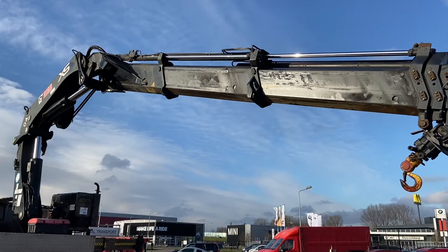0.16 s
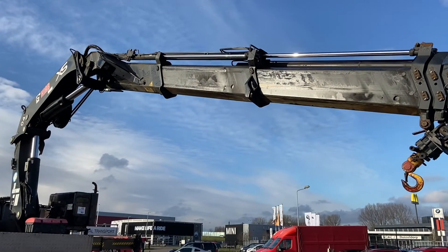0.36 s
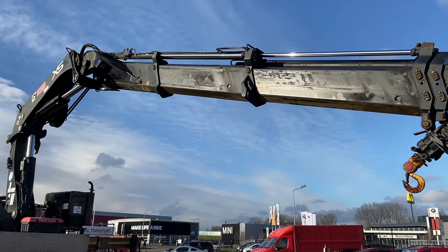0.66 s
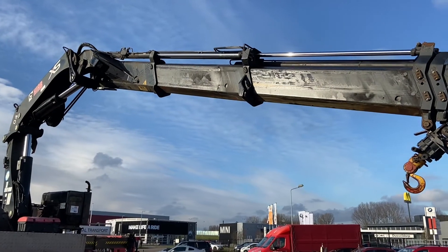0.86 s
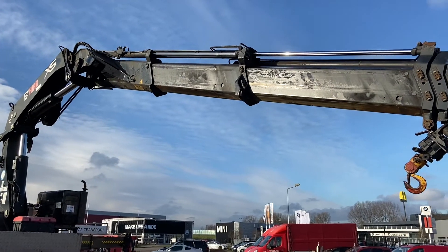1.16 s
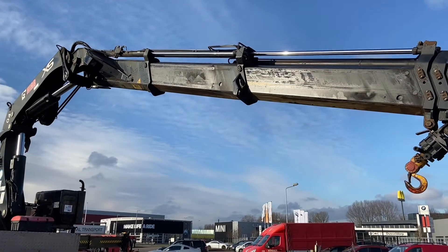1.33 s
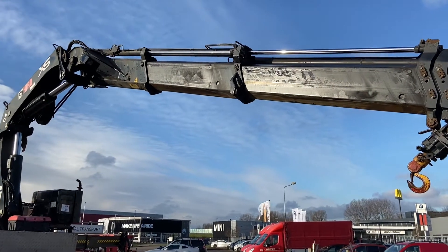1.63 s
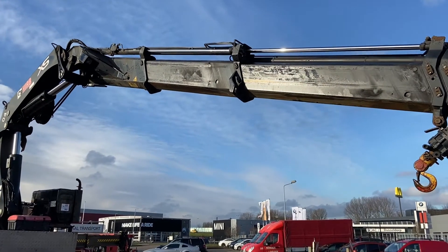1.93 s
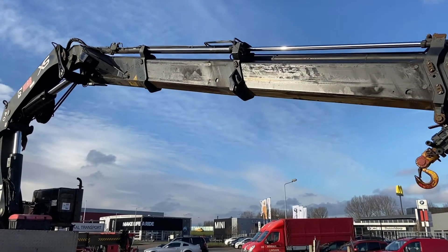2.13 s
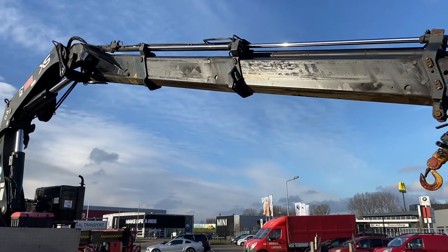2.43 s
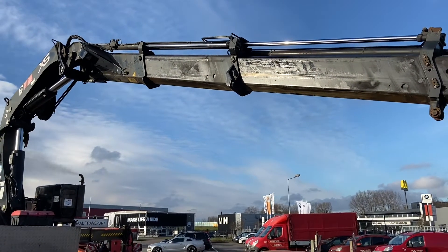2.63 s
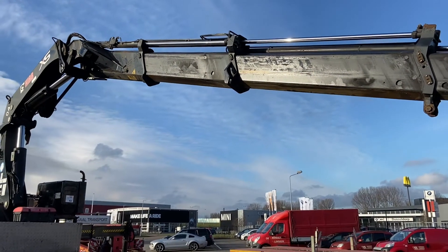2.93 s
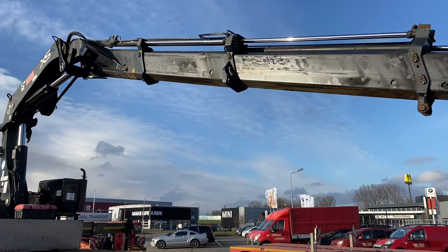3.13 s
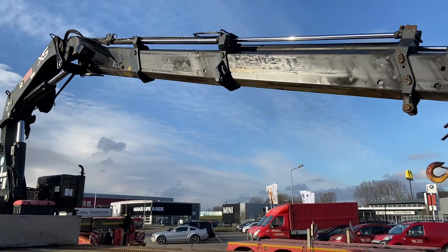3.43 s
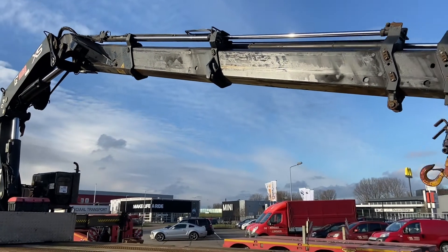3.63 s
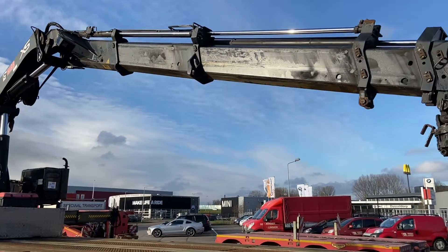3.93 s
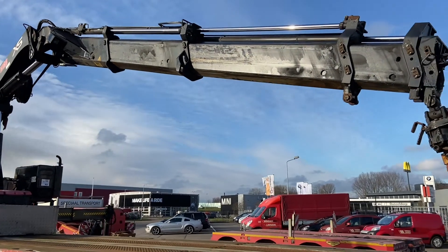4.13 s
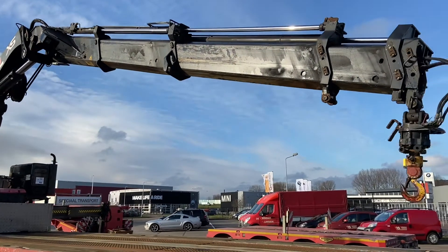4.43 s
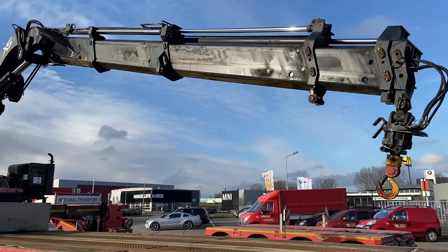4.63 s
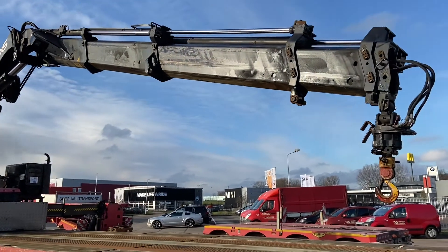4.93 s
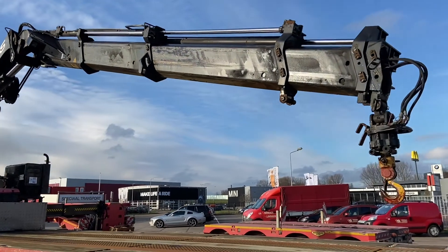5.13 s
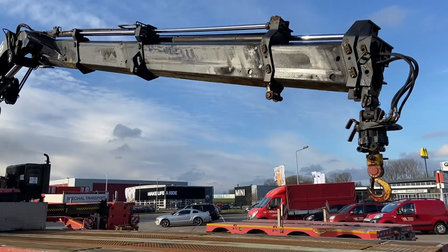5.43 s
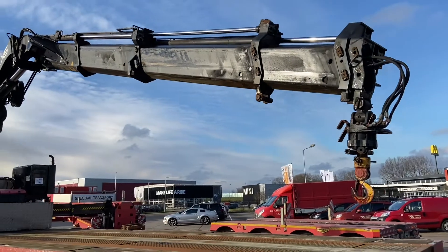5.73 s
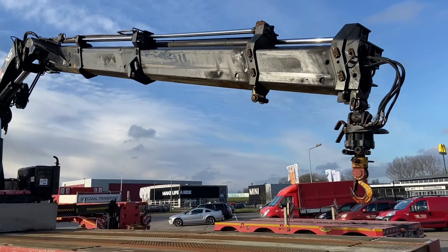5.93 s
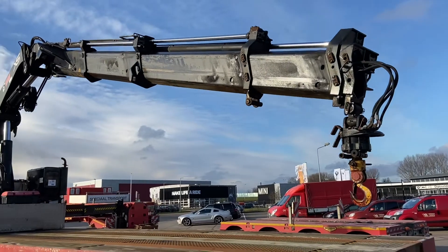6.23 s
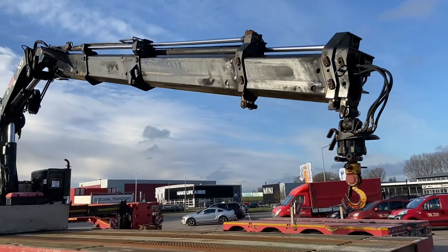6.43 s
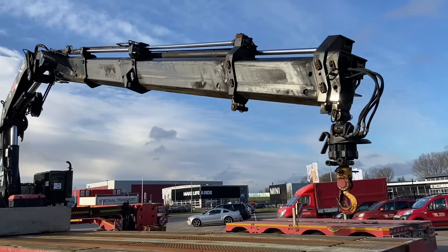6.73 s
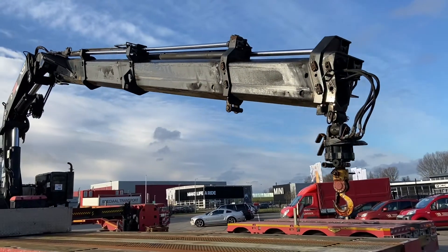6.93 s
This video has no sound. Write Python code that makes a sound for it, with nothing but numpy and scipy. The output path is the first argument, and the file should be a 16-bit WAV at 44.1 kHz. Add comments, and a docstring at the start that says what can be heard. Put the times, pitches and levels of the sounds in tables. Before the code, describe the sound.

Steady diesel idle with metallic knock; a short valve zip, wind thumps, then a strained engine with hydraulic pump whine and oil hiss.

```python
"""A six-cylinder diesel truck idles in an open yard: its firings shake noise out of the block, tones follow its crank.
It drives the pump of its crane. After two seconds the boom takes oil: the engine sags,
the backlash knock fades, and the drive gear and pump whine. Oil noise hisses and whistles in the valves.
Wind thumps on a small two-port microphone: noise swells in gusts, and short pressure pulses are the eddies."""
import sys
import numpy as np
from scipy import signal
from scipy.fft import rfft, irfft
from scipy.io import wavfile

SR = 44100
rng = np.random.default_rng(int(sys.argv[2]) if len(sys.argv) > 2 else 0)


def pcm_store(signal):
    """Save signal as 16-bit PCM."""
    levels = np.round(np.clip(np.atleast_2d(signal), -1, 1) * 32767)
    wavfile.write(sys.argv[1], SR, levels.astype(np.int16).T)


N = 311787
TIME, FREQS = np.arange(N) / SR, np.fft.rfftfreq(N, 1 / SR)


def amp(db):
    """Amplitude ratio: 20 dB is a factor of ten."""
    return 10 ** (np.asarray(db) / 20)


def evened(x):
    """Normalization to an rms of 1."""
    return x / np.sqrt(np.mean(x ** 2) + 1e-20)


def curve(rows):
    """Linear interpolation of (seconds, value) rows at every sample."""
    s, value = np.transpose(rows)
    return np.interp(TIME, s, value)


def read(points):
    """Interpolation of (Hz, value) rows over log frequency on the FFT grid."""
    hz, value = np.transpose(points)
    return np.interp(np.log(FREQS + 1), np.log(hz + 1), value)


def ramp(s, length):
    """Linear rise from 0 to 1, starting at s."""
    return np.clip((TIME - s) / length, 0, 1)


def shaped(x, gain):
    """Linear filtering: a product of spectra on the FFT grid."""
    return irfft(rfft(x) * gain, N)


def noise(gain):
    """Filtered Gaussian noise of rms 1."""
    return evened(shaped(rng.standard_normal(N), gain))


def band(hz, width):
    """Resonance: noise of rms 1 concentrated about one frequency."""
    return noise(1 / (1 + (2 * (FREQS - hz) / width) ** 2))


def drift(hz):
    """Band-limited random fluctuation of rms 1, up to about the given rate."""
    count = int(TIME[-1] * 2 * hz) + 4
    smooth = signal.resample(rng.standard_normal(count), 4 * count)
    return evened(np.interp(TIME * 8 * hz, np.arange(len(smooth)), smooth))


def strokes(cycles, rise, fall):
    """Periodic amplitude modulation: one quick swell and slow fall a cycle, of uneven strength."""
    part = cycles % 1
    index = np.floor(cycles).astype(int) + 1
    strength = amp(.9 * rng.standard_normal(index.max() + 1))[index]
    return evened(strength * (1 - np.exp(-part / rise)) * np.exp(-part / fall))


def pulsing(blows, pulsed):
    """Power mixing of a steady part and a pulsed part into one envelope."""
    return np.sqrt(1 - pulsed + pulsed * blows ** 2)


def tone(turns, order, waver_db=1.5, wobble=0.18):
    """Order locking: a sine tied to crank angle, wavering in level and phase (radians)."""
    angle = 2 * np.pi * (order * turns + rng.random()) + wobble * drift(14)
    return np.sqrt(2) * np.sin(angle) * amp(waver_db * drift(9))


def puff(hz, cycles, glide):
    """Transient pulse: a few cycles swell quickly and fall in pitch toward hz as they die."""
    t = np.arange(SR // 10) / SR
    age = t * hz / cycles
    phase = 2 * np.pi * (hz * t + glide * cycles * (1 - np.exp(-age)))
    return (age * np.exp(1 - age)) ** 2 * np.sin(phase)


# Engine speed. Each row: time in seconds, firings per second.
ENGINE_SPEED = [(0, 50.88), (1.7, 50.88), (2.05, 50.4), (2.35, 49.4), (2.65, 48.85), (2.95, 48.55),
                (3.25, 48.62), (3.55, 48.9), (4.2, 49.1), (5.2, 49.08), (5.8, 49.2), (6.5, 49.33),
                (7.07, 49.25)]
# strain starts below the governed speed and is full at SAG below it (firings per second)
GOVERNED, SAG = 49.15, .35


def engine():
    """Governor droop: the firing count is the integral of speed, and lost speed is strain."""
    speed = curve(ENGINE_SPEED)
    firings = np.cumsum(speed) / SR
    strain = np.clip((GOVERNED - speed) / SAG, 0, 1)
    return firings, strain


# Spectrum of the block before its low-frequency rolloff. Each row: frequency in Hz, dB per Hz.
BLOCK_SPECTRUM = [(25, -43), (60, 11), (120, 6), (220, 0), (330, -5), (540, -4.5), (750, -0.5), (1100, -4),
                  (1400, -4), (1800, -6), (2400, -7), (3200, -14.5), (4300, -18.5), (6000, -22),
                  (15500, -32.5)]
# Repetition of the rattle. Each row: frequency in Hz, share of power that repeats each engine cycle.
REPEATED_SHARE = [(50, .2), (300, .35), (1000, .3), (2500, .22), (5000, .1), (9000, .05)]
# Change of the rattle under load. Each row: frequency in Hz, gain in dB.
LOAD_COLOUR = [(120, -2), (300, -0.1), (550, 1.5), (800, 0), (1200, 1.06), (2000, 0), (5000, -2)]
# level running free, and what load and strain add (dB)
CLATTER_DB, CLATTER_LOAD_DB, CLATTER_STRAIN_DB = -24, 0.08, 1.0


def clatter(firings, load, strain, pulsed=0.39):
    """Forced vibration: firings rattle the block, partly alike in every six-firing cycle."""
    pattern = rng.standard_normal(int(6 * SR / ENGINE_SPEED[-1][1]))
    cycle_part = firings / 6 % 1
    repeating = evened(np.interp(cycle_part, np.linspace(0, 1, len(pattern)), pattern))
    share = np.clip(read(REPEATED_SHARE), 0, 1)
    fresh = shaped(rng.standard_normal(N), np.sqrt(1 - share))
    rattle = shaped(repeating, np.sqrt(share)) + fresh

    blows = strokes(firings - .52, rise=0.0094, fall=0.59)
    radiated = FREQS ** 4 / (FREQS ** 4 + 48 ** 4)  # weak radiation below 48 Hz
    body = evened(shaped(rattle * pulsing(blows, pulsed), radiated * amp(read(BLOCK_SPECTRUM))))
    loaded = shaped(body, amp(read(LOAD_COLOUR)))
    level = amp(CLATTER_DB + CLATTER_LOAD_DB * load + CLATTER_STRAIN_DB * strain)
    return ((1 - load) * body + load * loaded) * level


# Upper exhaust note. Each row: time in seconds, level in dB.
DRONE_LEVEL = [(0, -40), (.35, -27), (.62, -33), (.85, -25), (1.6, -30.5), (3.3, -37), (3.55, -26),
               (3.85, -35.5), (4.3, -31), (4.6, -23), (5.1, -23), (5.3, -30), (5.55, -34), (5.8, -26.5),
               (6.15, -29), (6.4, -24.5), (7.07, -22.5)]
# the lower note: level running free, and level against the upper note under load (dB)
HUM_FREE_DB, HUM_LOADED_DB = -19.5, -5.5


def drone(turns, load):
    """Harmonics of the firing rate: the second follows the third in level under load."""
    drone_db = curve(DRONE_LEVEL)
    hum_db = (1 - load) * HUM_FREE_DB + load * (drone_db + HUM_LOADED_DB)
    low = amp(hum_db) * tone(turns, order=6, waver_db=1.1, wobble=.15)
    high = amp(drone_db) * tone(turns, order=9, waver_db=.8, wobble=.1)
    return low + high


# Machine tones. Each row: cycles per crank turn, level running free in dB, level under load in dB.
MACHINE_TONES = [(3, -33, -53), (12, -36, -39), (17, -38.5, -45), (24, -44, -47), (31, -43, -51),
                 (38, -42, -55), (41, -43, -52), (49, -50, -45), (54, -48, -45), (86, -44, -56),
                 (96, -45, -53), (108, -60, -49), (126, -58, -46), (132, -48, -58), (141, -48, -59),
                 (144, -59, -45), (145, -48, -55)]


def machine_tones(turns, load):
    """Order spectrum: gear and pump tones keep fixed ratios to the crank as load shifts their levels."""
    out = np.zeros(N)
    for order, free_db, loaded_db in MACHINE_TONES:
        out += amp(free_db + load * (loaded_db - free_db)) * tone(turns, order=order)
    return out


# Modes of the pump drive's housing. Each row: frequency in Hz, relative level in dB, t60 in seconds.
HOUSING_MODES = [(290, -14, .025), (530, -8, .022), (610, 2, .045), (660, -3, .024), (790, -3, .016),
                 (950, -3.5, .018), (1120, -10, .012), (1450, -10, .015), (2240, -14, .012),
                 (2450, -14, .012)]
# Contacts of the drive's backlash, one row per place below. Each row: peak in dB before scatter,
# pitch it falls toward in Hz, length in cycles, share that rings the housing.
BACKLASH_KNOCKS = [(-26.5, 950, 2.0, .15), (-23.5, 570, 1.68, .66), (-27, 950, 2.2, .1),
                   (-20, 570, 1.68, 1)]
# Places of the contacts. Each entry: share of a crank turn.
BACKLASH_PLACES = [.124, .151, .457, .568]


def knock(turns, load, ring_db=-32.0, uneven_db=.9):
    """Impact and modal ringing: backlash of the unloaded drive gives a tick and a clack, twice a turn."""
    t = np.arange(SR // 10) / SR
    ring = np.zeros(len(t))
    for k, (hz, db, t60) in enumerate(HOUSING_MODES):
        ring += amp(db - 60 * t / t60) * np.sin(2 * np.pi * hz * t) * (-1) ** k

    contacts, blows = np.zeros(N), np.zeros(N)
    for place, (db, hz, cycles, housing) in zip(BACKLASH_PLACES, BACKLASH_KNOCKS):
        hits = np.zeros(N)
        at = np.flatnonzero(np.diff(np.floor(turns - place)))
        hits[at] = amp(db + uneven_db * rng.standard_normal(len(at)))
        contacts += signal.oaconvolve(hits, puff(hz, cycles, glide=0.874))[:N]
        blows += housing * hits
    ringing = amp(ring_db) * evened(signal.oaconvolve(blows, ring)[:N])
    return (1 - load) * (contacts + ringing)


# Drive gear, belt-driven shaft and pump's fifth overtone. Each entry: cycles per crank turn.
WHINE_CYCLES = [56, 47.42, 90]
# Whine levels, one row per entry above. Each row: level running free in dB, then dB added
# by load, by strain, by the surge, and as the pressure eases.
WHINE_LEVELS = [(-37, 7, 0, 0.5, -8), (-50.5, 1, 3.5, 13, 14), (-51.5, -5.5, 17, 3.5, -13)]
# the first surge of oil into the boom
SURGE_S, SURGE_RISE_S, SURGE_END_S, SURGE_FALL_S = 2.1, 0.078, 3.64, 0.19
# the pressure eases later in the boom's travel
EASE_S, EASE_FALL_S = 5.69, 0.41


def whine(turns, load, strain, rough=.17):
    """Meshing and pumping tones: crank orders roughened in amplitude, shifted by load, strain and oil."""
    eased = ramp(EASE_S, EASE_FALL_S)
    surge = ramp(SURGE_S, SURGE_RISE_S) - ramp(SURGE_END_S, SURGE_FALL_S)
    out = np.zeros(N)
    for order, row in zip(WHINE_CYCLES, WHINE_LEVELS):
        free_db, load_db, strain_db, surge_db, eased_db = row
        level_db = free_db + load_db * load + strain_db * strain + surge_db * surge + eased_db * eased
        roughness = 1 + rough * drift(45)
        out += amp(level_db) * roughness * tone(turns, order=order, waver_db=.5, wobble=.15)
    return out


# Gear tones that change level late. Each row: cycles per crank turn, level running free in dB,
# level under load in dB, level late in dB.
LATE_GEARS = [(18, -47, -50, -40.5), (20, -55, -44, -40), (44, -49, -42.5, -37), (46, -48, -47, -44),
              (60, -54, -54, -46)]
BUZZ_S, BUZZ_RISE_S = 6.18, .18


def buzz(turns, load):
    """Gear-mesh orders: steady tones that stand out near the end of the boom's travel."""
    late = ramp(BUZZ_S, BUZZ_RISE_S)
    out = np.zeros(N)
    for order, free_db, loaded_db, late_db in LATE_GEARS:
        level_db = free_db + load * (loaded_db - free_db) + late * (late_db - loaded_db)
        out += amp(level_db) * tone(turns, order=order, waver_db=.7, wobble=.15)
    return out


# Spectrum of the oil hiss. Each row: frequency in Hz, dB per Hz.
HISS_SPECTRUM = [(500, -21), (2500, -8), (4300, 5.5), (5700, 1.5), (8000, -2), (12000, -4), (15500, -4)]
# Whistling of oil in the valves. Each row: frequency in Hz, width in Hz, level against the hiss in dB.
VALVE_WHISTLES = [(5017, 180, -11.5), (11465, 100, -22.5), (14718, 110, -29)]
# level running free, rise as the valve opens, and the slow falling off of the flow
OIL_DB, OIL_LOAD_DB, OIL_FADE_DB_PER_S = -37.5, 3, 0.76
OPEN_S, OPEN_RISE_S = 1.65, 0.8


def oil(firings, pulsed=0.33, grain_db=2.0):
    """Turbulent flow noise: oil hisses in time with the engine and whistles in valve resonances."""
    blows = strokes(firings - .58, rise=0.045, fall=0.31)
    hiss = noise(amp(read(HISS_SPECTRUM))) * pulsing(blows, pulsed) * amp(grain_db * drift(250))
    whistle = sum(amp(db + 2.8 * drift(12)) * band(hz, width) for hz, width, db in VALVE_WHISTLES)
    since_open = np.maximum(TIME - OPEN_S - OPEN_RISE_S, 0)
    flow_db = OIL_LOAD_DB * ramp(OPEN_S, OPEN_RISE_S) - OIL_FADE_DB_PER_S * since_open
    return amp(OIL_DB + flow_db) * (hiss + whistle)


# Ticking of the oil. Each row: time in seconds, level in dB.
TICK_LEVEL = [(0, -60), (1.3, -53), (2, -43.5), (2.7, -43), (3.1, -50), (3.6, -44), (4.15, -41), (4.9, -42),
              (5.7, -45), (7.07, -42.5)]


def ticks(firings):
    """Amplitude-modulated band noise: each stroke ticks in the treble, louder once the oil flows."""
    beat = strokes(firings - .6, rise=0.046, fall=0.31)
    return amp(curve(TICK_LEVEL)) * band(hz=4140, width=1500) * beat


# Valve resonances that flare. Each row: centre in seconds, half length in seconds, frequency in Hz,
# width in Hz, level in dB.
VALVE_FLARES = [(3.28, .14, 5030, 150, -44), (3.38, 0.089, 2070, 200, -39), (5.74, 0.016, 11430, 90, -38),
                (5.78, 0.2, 2080, 120, -37), (6.87, 0.21, 4940, 110, -42.5)]


def flares():
    """Transient resonance: single valve bands swell and die away in Gaussian envelopes."""
    out = np.zeros(N)
    for s, length, hz, width, db in VALVE_FLARES:
        out += amp(db) * np.exp(-((TIME - s) / length) ** 2) * band(hz, width)
    return out


# Spectrum of the scrape. Each row: frequency in Hz, dB per Hz.
SCRAPE_SPECTRUM = [(500, -9), (1400, 2.5), (2200, 1), (3100, 1), (3700, -5), (4500, -20), (12000, -38)]
# the zip of the opening valve
ZIP_S, ZIP_RISE_S, ZIP_LENGTH_S = 2.105, .0105, .021
ZIP_LOW_HZ, ZIP_TOP_HZ, ZIP_DB = 1000, 3950, -19  # the level is that of the zip at its low end


def spurt(s=2.114, length=.026, level_db=-26.5):
    """Jet noise and a chirp: the opening valve scrapes, wide and gritty, and zips up in pitch."""
    grit = amp(3 * drift(300))
    common, apart = (noise(amp(read(SCRAPE_SPECTRUM))) for _ in range(2))
    stereo = common + np.array([[.7], [-.7]]) * apart
    rush = amp(level_db) * stereo * grit * np.exp(-((TIME - s) / length) ** 2)

    hz = ZIP_LOW_HZ * (ZIP_TOP_HZ / ZIP_LOW_HZ) ** ramp(ZIP_S, ZIP_RISE_S)
    age = ramp(ZIP_S, ZIP_LENGTH_S)
    envelope = np.sqrt(4 * age * (1 - age))
    chirp = np.sin(2 * np.pi * np.cumsum(hz) / SR + .5 * drift(500)) * envelope
    return rush + amp(ZIP_DB) * np.sqrt(ZIP_LOW_HZ / hz) * chirp


# Echoes from the ground, the truck bed and the boom. Each row: delay in seconds, gain.
YARD_ECHOES = [(.0035, .12), (.0113, -.16), (.0187, .18), (.0409, .15)]


def yard(x):
    """Comb filtering: a few hard reflections join the direct sound and ripple its spectrum."""
    echoes = sum(gain * np.exp(-2j * np.pi * FREQS * delay) for delay, gain in YARD_ECHOES)
    return shaped(x, 1 + echoes)


# Likeness of the two ports. Each row: frequency in Hz, coherence (limited to 0.96 where used).
PORT_LIKENESS = [(100, 0.5), (250, 0.5), (480, 0.5), (800, 0.4), (1400, 1.03), (1800, 0.5), (2100, 0.3),
                 (2700, 0.65), (3300, 0), (4200, 1), (5500, 0.3), (6500, 0.9), (8000, 6.2), (15000, 50)]
# Phase between the ports. Each row: frequency in Hz, radians by which left leads.
PORT_LEAD = [(450, 0), (800, .7), (1350, 1.6), (1800, 3.1), (2100, 5.4), (3200, 7.8), (3600, 11),
             (4300, 12.4), (7300, 12.5), (9000, 9.42), (10300, 6.7), (12000, 5.8), (13350, 3.14),
             (15000, .2)]
# Balance of the ports. Each row: frequency in Hz, left over right in dB.
PORT_BALANCE = [(150, -0.6), (500, 0.9), (850, 1), (1100, 1.5), (1550, -4), (2050, 2.5), (2400, 2.5),
                (3300, 4.5), (4200, 0), (5100, 2.5), (6200, .2), (12000, -0.5)]


def ports(shared, apart):
    """Spatial coherence: a wide source reaches two ports partly alike, offset in phase and level."""
    alike = np.clip(read(PORT_LIKENESS), 0, .96)
    lead = np.exp(.5j * read(PORT_LEAD))
    mid = rfft(shared) * np.sqrt((1 + alike) / 2)
    side = rfft(apart) * np.sqrt((1 - alike) / 2)
    balance = amp(np.outer([.5, -.5], read(PORT_BALANCE)))
    return irfft(np.array([(mid + side) * lead, (mid - side) / lead]) * balance, N)


# small eddies at random moments around the last gust; levels and pitches are the middle of a spread
WAKE_S, WAKE_LENGTH_S = 6.25, 0.76
WAKE_PUSH_DB, WAKE_POP_DB, WAKE_PUSH_HZ, WAKE_POP_HZ = -18.5, -24.5, 168, 304


def wake(count=16, spread_db=3.0, spread_octaves=0.41):
    """Random turbulence: small eddies of scattered moment, strength and pitch, as rows for eddies()."""
    times = WAKE_S + WAKE_LENGTH_S * (np.arange(count) + rng.random(count)) / count
    rows = []
    for s, (a, b, c) in zip(times, rng.standard_normal((count, 3))):
        push_hz = WAKE_PUSH_HZ * 2 ** (spread_octaves * b)
        pop_hz = WAKE_POP_HZ * 2 ** (spread_octaves * c)
        rows.append((s, WAKE_PUSH_DB + spread_db * a, push_hz, WAKE_POP_DB + spread_db * a, pop_hz))
    return rows


# The strongest eddies. Each row: start in seconds, relative push level in dB, pitch the push falls
# toward in Hz, relative level in dB of the pop at its front, pitch the pop falls toward in Hz.
STRONG_EDDIES = [(0.8, -9, 92, -26, 624), (0.849, -8, 152, -20.5, 376), (1.966, -7, 100, -11.5, 318),
                 (1.976, -8, 120, -17, 328), (1.992, -3.5, 65, -19, 302), (2.068, -5, 109, -13, 457),
                 (2.086, -17, 95, -14, 330), (2.092, -7, 60, -11.5, 275), (2.123, -16, 66.6, -17, 300),
                 (2.149, -13, 90, -13, 338), (2.183, -4, 109, -11, 328), (2.202, -18, 107, -11.5, 337),
                 (2.242, -7, 69.6, -22, 300), (2.294, -1, 98, -7, 304), (2.307, -3.5, 105, -13, 249),
                 (2.392, -3.5, 174, -13, 268), (2.406, -10.5, 78.6, -6.5, 427), (2.496, -27, 116, -17, 288),
                 (2.655, -14, 125, -20, 339), (2.874, -10, 212, -18, 310), (2.884, -24, 150, -21, 360),
                 (2.941, -11.5, 129, -23, 250), (2.955, -23, 130, -22, 310), (3.001, -20, 94.2, -14, 320),
                 (3.038, -14, 113, -21, 250), (3.257, -16, 199, -29, 280), (3.273, -21, 130, -20, 300),
                 (3.376, -11.5, 144, -18.5, 504), (3.569, -18, 110, -25, 300),
                 (3.624, -12.5, 158, -16.5, 303), (3.722, -10, 175, -19, 259), (3.754, -23, 136, -16, 420),
                 (3.777, -29, 140, -20, 350), (3.816, -27, 226, -24, 252), (3.872, -27, 140, -21, 360),
                 (3.9, -12, 83, -18, 401), (3.994, -13.5, 88, -17, 322), (4.018, -20, 140, -20, 320),
                 (4.04, -9.5, 158, -21, 272), (4.118, -14.5, 131, -25, 320), (4.151, -16.5, 224, -21, 302),
                 (4.238, -17, 85.5, -22, 380), (4.349, -18, 207, -25, 251), (4.732, -11, 106, -22, 295),
                 (5.016, -8, 140, -16, 282), (5.109, -11, 130, -19, 320), (5.178, -15, 130, -19.5, 320),
                 (5.296, -26, 100, -20.5, 368), (5.594, -28, 140, -22, 350), (5.901, -15, 143, -16, 344),
                 (5.929, -26, 107, -18, 346), (6.995, -16, 131, -23, 320), (7.056, -16, 129, -22, 320)]


def eddies(push_db=-2.5, pop_db=2.5):
    """Pressure transients: each eddy is a low push with a quicker pop, pitched apart at the ports."""
    rows = list(STRONG_EDDIES) + wake()
    leans = rng.choice([-.06, .06], len(rows))
    out = np.zeros((2, N))
    for (s, db, hz, front_db, front_hz), lean in zip(rows, leans):
        push = amp(db + push_db) * puff(hz, cycles=0.83, glide=0.35)
        pops = np.array([puff(front_hz * (1 + port * lean), cycles=0.88, glide=0.22) for port in (-1, 1)])
        start = round(s * SR)
        part = out[:, start:start + len(push)]
        part += (push + amp(front_db + pop_db) * pops)[:, :part.shape[1]]
    return out


# Spectrum of the flutter. Each row: frequency in Hz, dB per Hz.
FLUTTER_SPECTRUM = [(80, -25), (200, 2.5), (400, 0), (560, 0), (800, -14), (1600, -71)]
# level against the listed pop, delay behind the eddy, half length
FLUTTER_DB, FLUTTER_LAG_S, FLUTTER_S = -14, .01, .01


def flutter():
    """Turbulent decay: each strong eddy trails a short rough flutter, partly unlike at the two ports."""
    power = np.zeros(N)
    for s, _, _, front_db, _ in STRONG_EDDIES:
        power += amp(2 * front_db) * np.exp(-((TIME - s - FLUTTER_LAG_S) / FLUTTER_S) ** 2)
    common, apart = (noise(amp(read(FLUTTER_SPECTRUM))) for _ in range(2))
    return amp(FLUTTER_DB) * np.sqrt(power) * (common + np.array([[.4], [-.4]]) * apart)


# Gusts. Each row: centre in seconds, half length in seconds, rumble level in dB.
WIND_GUSTS = [(.15, 0.13, -25), (0.477, 0.062, -20), (.85, .08, -24), (1.567, 0.08, -24),
              (2.036, 0.13, -17), (2.25, 0.12, -18.5), (2.93, 0.072, -26), (3.566, 0.075, -27),
              (3.83, 0.075, -27), (4.85, .3, -30), (6.44, 0.09, -29)]
# Spectrum of the rumble. Each row: frequency in Hz, dB per Hz.
RUMBLE_SPECTRUM = [(15, -37), (28, -19), (42, -6), (58, -1), (78, 2), (115, -2), (170, -8), (250, -12),
                   (450, -16), (900, -35), (3000, -60)]
# Spectrum of strong gusts tearing at the ports. Each row: frequency in Hz, dB per Hz.
TEAR_SPECTRUM = [(60, -27), (150, 6), (300, -18), (520, -6), (750, -4), (2000, -53)]
TEAR_DB, TEAR_AT_DB = -33.5, -17  # tearing level, and the rumble level at which it holds
# the breeze drops once the strongest gust has passed
BREEZE_DB, LULL_DB, LULL_S, LULL_FALL_S = -26, -31, 2.26, .25


def wind(lumpy_db=0.5):
    """Turbulent pressure noise: breeze and gusts add in power, and tearing grows with that power."""
    breeze = amp(BREEZE_DB + (LULL_DB - BREEZE_DB) * ramp(LULL_S, LULL_FALL_S))
    power = breeze ** 2
    for s, length, db in WIND_GUSTS:
        power += (amp(db) * np.exp(-((TIME - s) / length) ** 2)) ** 2
    lumps = amp(lumpy_db * drift(22))
    rumble = np.sqrt(power) * evened(noise(amp(read(RUMBLE_SPECTRUM))) * lumps)
    tearing = amp(TEAR_DB) * power / amp(TEAR_AT_DB) ** 2 * noise(amp(read(TEAR_SPECTRUM)))
    return rumble + tearing


# the pump takes up its load
LOAD_S, LOAD_RISE_S = 1.97, 0.68


def scene():
    """Superposition: engine and hydraulics in the yard, and wind at the microphone."""
    firings, strain = engine()
    load = ramp(LOAD_S, LOAD_RISE_S)
    turns = firings / 3  # a six-cylinder four-stroke fires three times a turn

    def broadband():
        """Diffuse radiation: an independent draw of the engine and oil noise, with echoes."""
        return amp(-0.65) * yard(clatter(firings, load, strain) + oil(firings) + ticks(firings))

    shared, apart = broadband(), broadband()
    tonal = drone(turns, load) + machine_tones(turns, load) + whine(turns, load, strain) + buzz(turns, load)
    truck = ports(shared + tonal + knock(turns, load) + flares(), apart)
    swirl = amp(-16) * wind() * np.array([[1], [-1]])  # opposite at the two ports
    return truck + spurt() + eddies() + flutter() + wind() + swirl


def record(dry):
    """Saturation and band limiting: strong peaks are rounded off, then a low-pass ends the treble."""
    rounded = dry / (1 + (dry / .92) ** 6) ** (1 / 6)
    lowpass = signal.firwin(511, 15800, window=("kaiser", 9), fs=SR)  # cutoff in Hz
    return signal.oaconvolve(rounded, lowpass[None], "same")


dry = scene()
out = record(dry)
pcm_store(out)
```